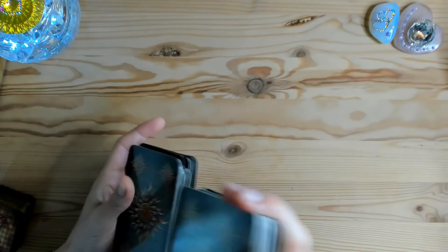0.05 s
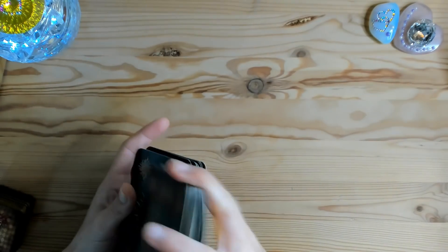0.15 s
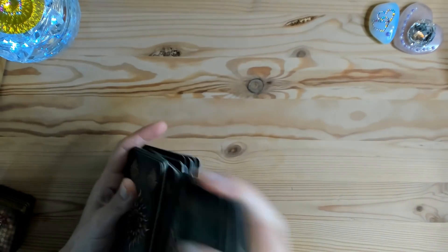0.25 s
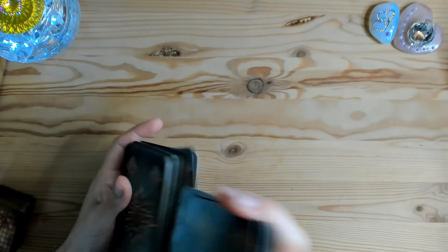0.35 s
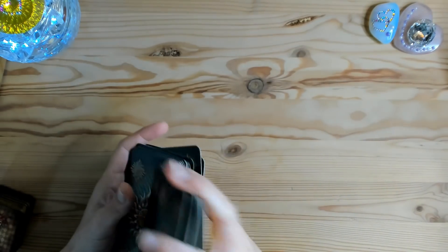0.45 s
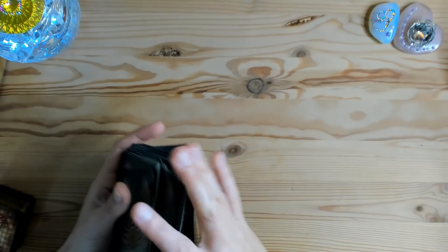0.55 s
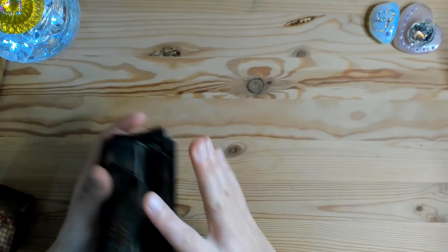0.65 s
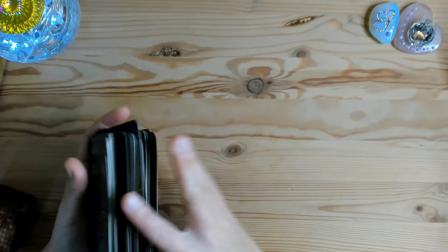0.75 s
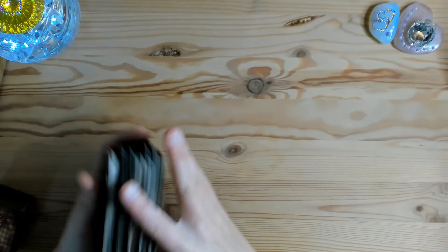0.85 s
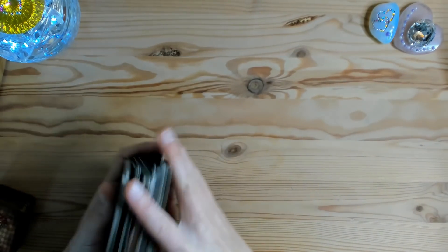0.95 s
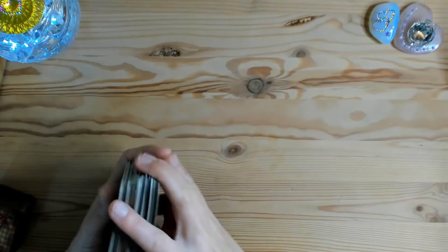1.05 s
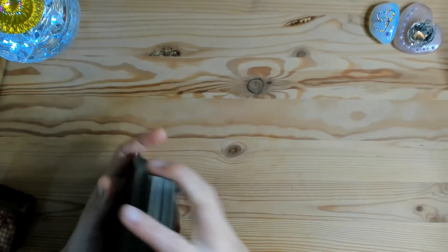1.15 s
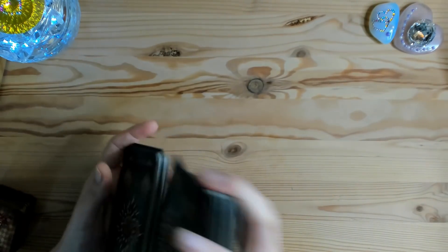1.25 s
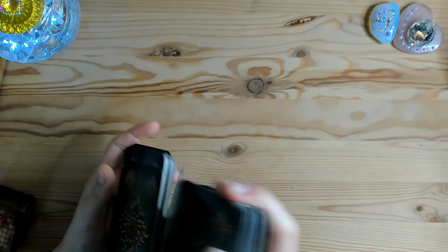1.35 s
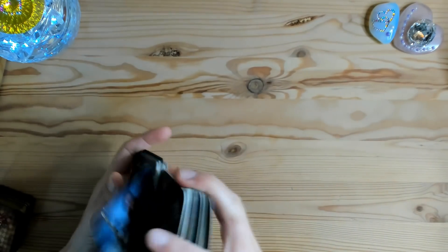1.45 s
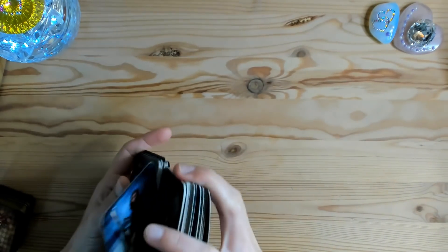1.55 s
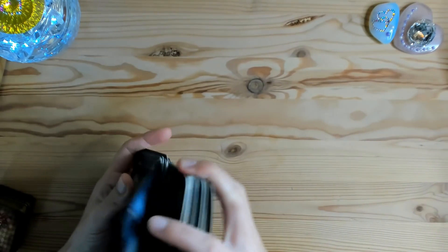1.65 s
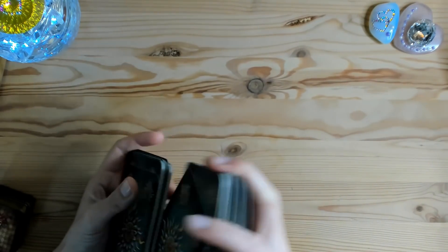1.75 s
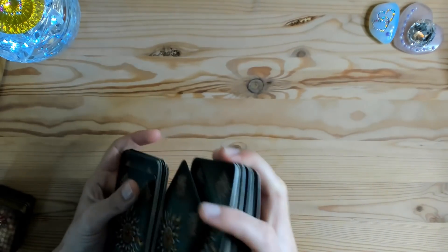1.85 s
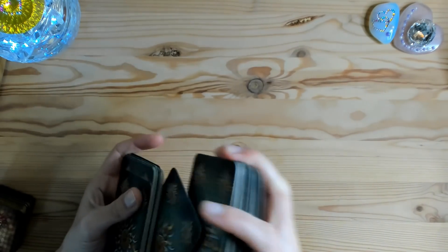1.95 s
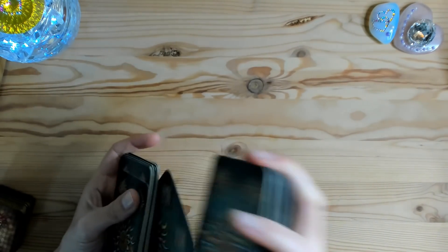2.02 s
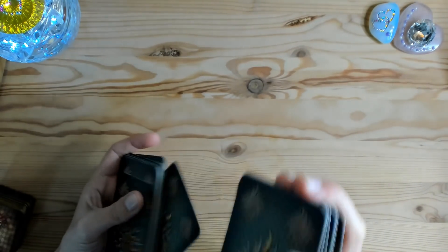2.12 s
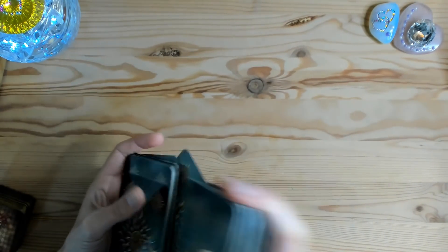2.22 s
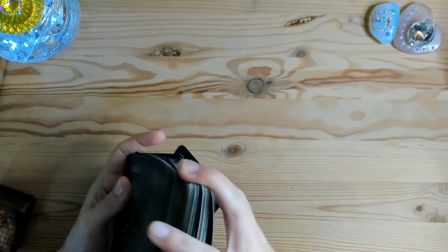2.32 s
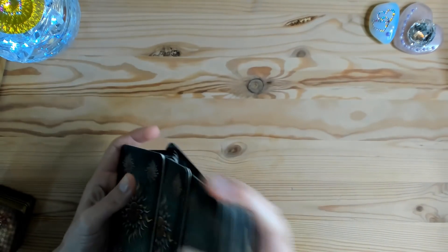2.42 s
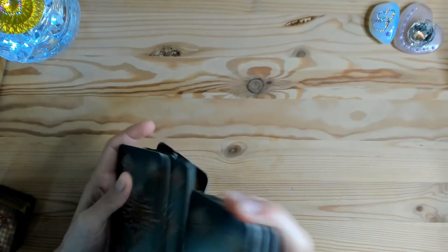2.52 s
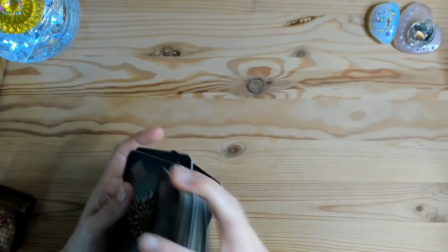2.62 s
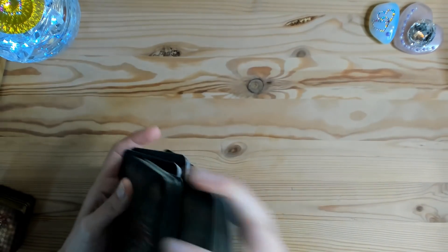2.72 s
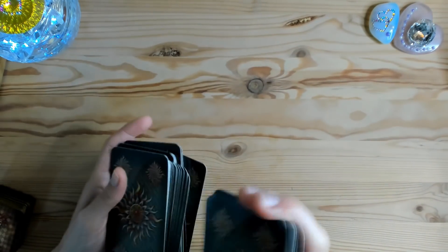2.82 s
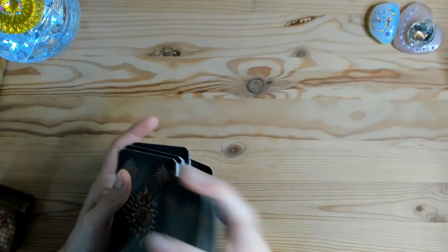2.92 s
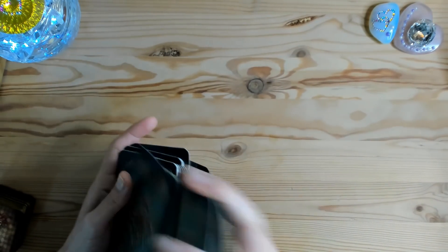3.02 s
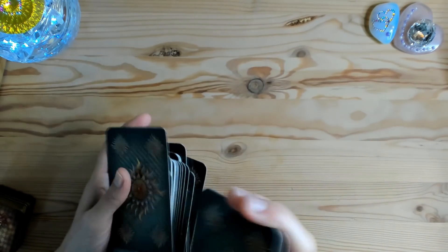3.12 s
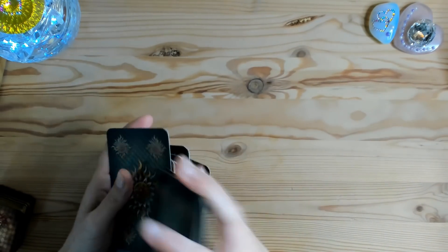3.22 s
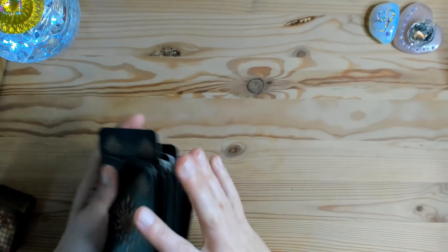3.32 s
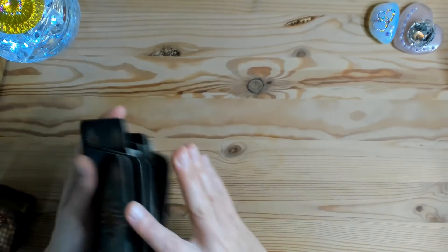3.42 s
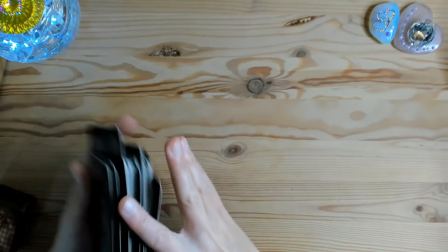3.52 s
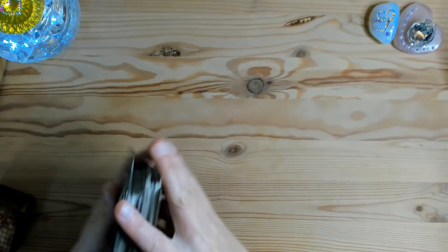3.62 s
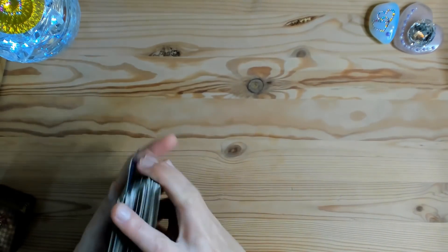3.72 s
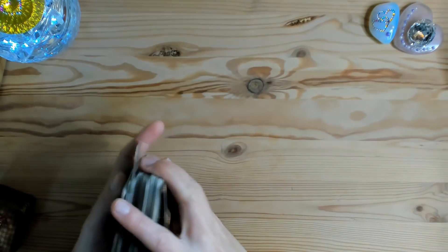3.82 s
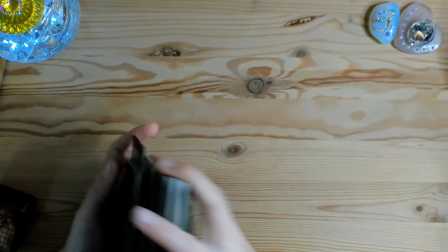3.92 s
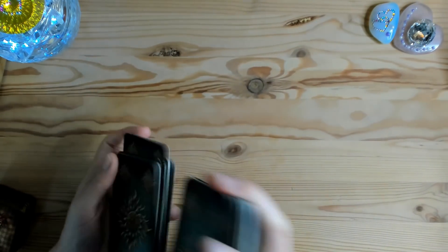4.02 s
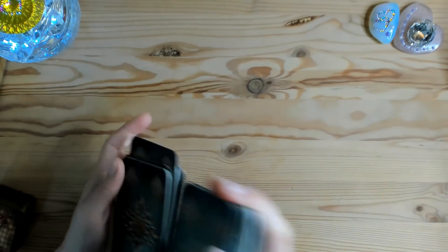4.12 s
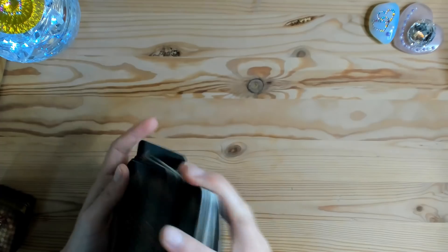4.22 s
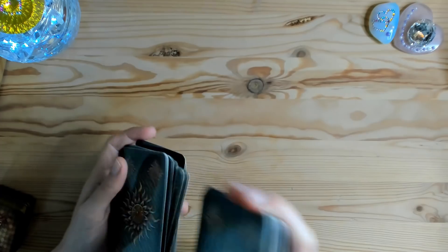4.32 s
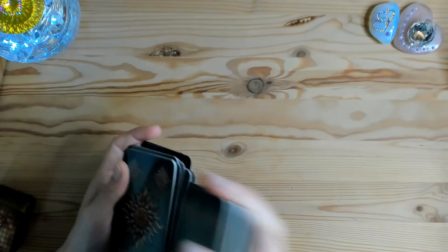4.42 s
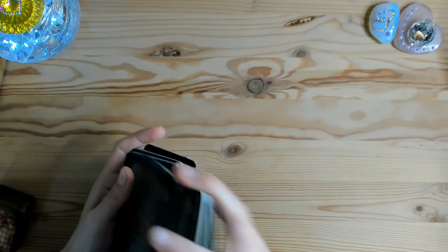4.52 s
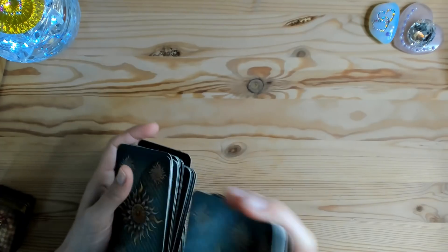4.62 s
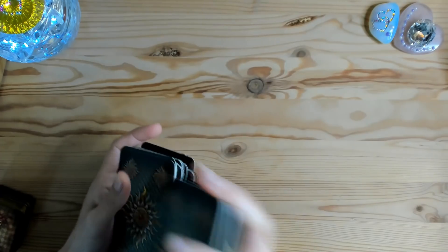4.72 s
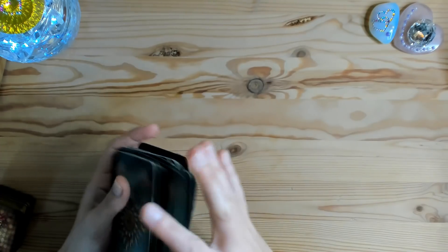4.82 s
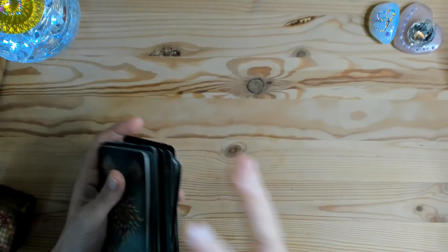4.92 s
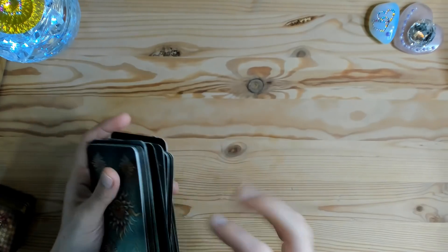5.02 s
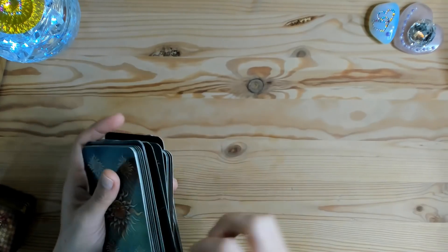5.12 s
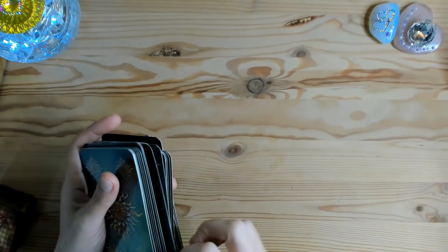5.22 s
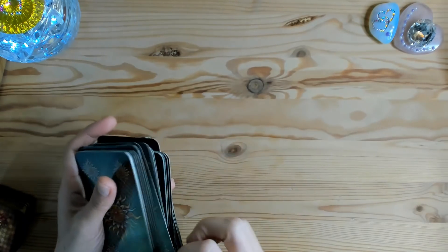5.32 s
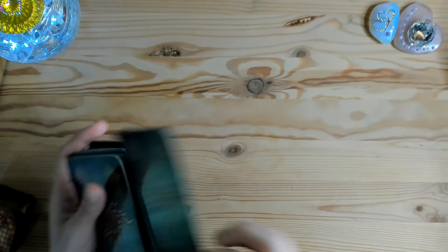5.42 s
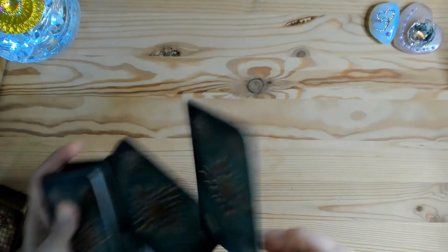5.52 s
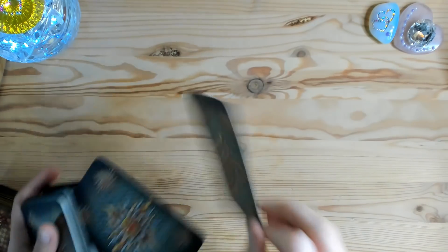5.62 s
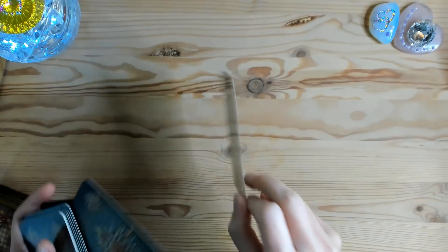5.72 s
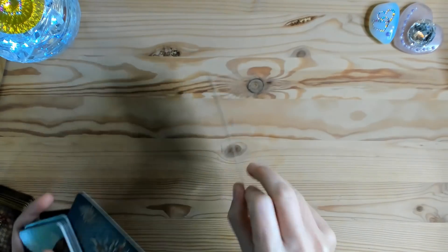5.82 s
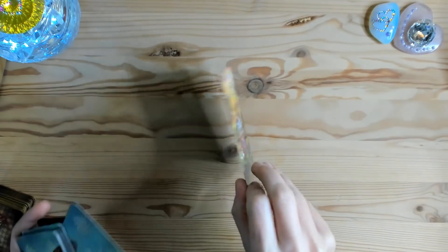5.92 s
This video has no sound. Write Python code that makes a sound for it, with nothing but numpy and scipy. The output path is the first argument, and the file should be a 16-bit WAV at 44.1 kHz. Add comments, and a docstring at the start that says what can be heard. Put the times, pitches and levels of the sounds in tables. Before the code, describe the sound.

Close-up handling of a thick card deck: quick snapping slaps, papery scrapes and dull palm knocks come in uneven groups, with soft squaring rubs between them. A few airy slips whisk by after one second, a hard double crack follows at two, and more packets drop until nearly five. Then there is a brief lull and a light rustle as a card is drawn. Dry room, very short reflections, low steady background.

```python
"""Large cards are shuffled overhand above a wooden table: each landing card mixes an air puff (noise),
a clap (dying sines of air pocket and deck) and an edge tick (bright noise).
Packets slide as rasping and hissing friction noise; cards, deck and palm thud and knock as short low pushes.
Light rubs lift or square the deck or draw a card, quick slips swell and die as noise, the hands stir a rumble.
Close echoes, a faint dull tail and a quiet, steady room tone of filtered noise surround them."""
import sys
import numpy as np
from scipy import signal
from scipy.fft import rfft, irfft, next_fast_len
from scipy.io import wavfile

SR = 44100
rng = np.random.default_rng(int(sys.argv[2]) if len(sys.argv) > 2 else 0)


def pcm_store(signal):
    """Save signal as 16-bit PCM."""
    levels = np.round(np.clip(np.atleast_2d(signal), -1, 1) * 32767)
    wavfile.write(sys.argv[1], SR, levels.astype(np.int16).T)


N = 262819
TIME = np.arange(N) / SR
HIT_TIME = np.arange(4096) / SR
HIT_SPAN_S = 0.005


def from_db(db):
    """Decibels to gain."""
    return 10 ** (np.asarray(db) / 20)


def rms_one(x):
    """Scale to rms 1."""
    return x / np.sqrt(np.mean(x ** 2) + 1e-20)


def hit_one(x):
    """Scale a short sound to the energy of rms 1 over one hit span."""
    return x / np.sqrt(np.sum(x ** 2) / (HIT_SPAN_S * SR) + 1e-20)


def add(track, time_s, sound):
    """Mix a sound into a track at a time."""
    start = int(np.clip(round(time_s * SR), 0, N - 1))
    track[start:start + len(sound)] += sound[:N - start]


def colour(x, spectrum):
    """Causal minimum-phase filter that follows a spectrum, via the folded cepstrum."""
    size = 2 * next_fast_len(len(x))
    hz, db = np.transpose(spectrum)
    bins_hz = np.maximum(np.arange(size // 2 + 1) * SR / size, 1)
    bins_db = np.interp(np.log(bins_hz), np.log(hz), db)
    cepstrum = irfft(np.log(from_db(bins_db)))
    cepstrum[1:size // 2] *= 2
    cepstrum[size // 2 + 1:] = 0
    response = np.exp(rfft(cepstrum))
    return irfft(rfft(x, size) * response)[:len(x)]


def drift(turns_per_s):
    """Bounded random wander of rms 1."""
    steps = rng.uniform(-1, 1, N // 10)
    return rms_one(np.interp(TIME * turns_per_s, np.arange(len(steps)), steps))


def ring(hz, t60_s):
    """A struck, dying sine."""
    return np.sin(2 * np.pi * hz * HIT_TIME) * from_db(-60 * HIT_TIME / t60_s)


def burst(spectrum, t60_s, snap):
    """A sharp contact followed by a dying scatter of tiny ones."""
    scatter = rng.standard_normal(len(HIT_TIME)) * from_db(-60 * HIT_TIME / t60_s)
    scatter[0] = snap
    return hit_one(colour(scatter, spectrum))


def thin(x, corner_hz):
    """A small source radiates little below a corner."""
    corner_hz = np.clip(corner_hz, 50, SR / 4)
    return signal.sosfilt(signal.butter(2, corner_hz, "high", fs=SR, output="sos"), x)


def friction(spectrum, catches_per_s, size_db, smooth_db, flutter_db, flutter_per_s):
    """Tiny catches of uneven size on a smooth rub, fluttering as the card sticks and slips."""
    signs = rng.choice([-1, 1], N)
    sizes = from_db(size_db * np.minimum(rng.exponential(1, N), 4)) * signs
    catches = rms_one(sizes * (rng.random(N) < catches_per_s / SR))
    rub = catches + from_db(smooth_db) * rng.standard_normal(N)
    flutter = from_db(flutter_db * drift(flutter_per_s))
    return rms_one(colour(rub * flutter, spectrum))


# clearest landing cards:
# (time [s], puff before trim [dB], clap before trim [dB], tick before trim [dB], clap pitch [Hz])
SLAP_HITS = [(0.0791, -33, -42, -39, 1590), (0.085, -66, -30, -57, 2630), (0.0919, -52, -19.5, -27, 2076),
             (0.1403, -45, -37.5, -36.5, 3670), (0.1502, -55, -46, -46, 3900),
             (0.2172, -35.5, -45.5, -49, 3200), (0.2816, -44.5, -43, -38.5, 2000),
             (0.377, -38, -33.5, -41, 1980), (0.385, -48, -33.5, -36, 1590), (0.4596, -46, -42, -44, 1120),
             (0.4629, -35.5, -38.5, -44, 1540), (0.6044, -54, -50.5, -67, 940),
             (1.158, -41.5, -57, -69, 870), (1.288, -30, -47, -59, 835), (1.528, -46, -59, -73, 1260),
             (1.606, -31.5, -31.5, -36, 1060), (1.634, -57, -42.5, -70, 870),
             (1.6398, -51, -39.5, -69, 1241), (2.2196, -26, -28, -25.5, 1970),
             (2.2227, -64, -31.5, -50, 1314), (2.239, -53, -42, -38, 1850),
             (2.2427, -30, -27.5, -33.5, 1737), (2.249, -32.5, -33, -33.5, 2020),
             (2.5407, -41.5, -43, -54, 1570), (2.567, -47.5, -51, -54.5, 1440),
             (2.596, -55, -52.5, -59, 1630), (2.6373, -35, -44, -56, 900), (2.69, -47, -55.5, -70, 1350),
             (2.822, -53, -60.5, -68, 2600), (2.88, -42, -30.5, -36.5, 1590),
             (2.8884, -36, -35.5, -32.5, 2770), (3.14, -36, -50.5, -45.5, 2450),
             (3.1947, -56, -46, -45, 2144), (3.207, -42.5, -46, -41, 2040), (3.331, -47.5, -63, -65, 850),
             (3.555, -52, -66, -50.5, 3050), (3.703, -43, -50.5, -47.5, 2665), (3.876, -42, -49, -70, 803),
             (3.913, -66.5, -64.5, -60, 2200), (4.042, -76.5, -66, -66, 2980),
             (4.1368, -36, -39.5, -40.5, 2480), (4.1398, -40, -38.5, -53, 1680),
             (4.217, -57, -53.5, -55.5, 2700), (4.387, -29, -39, -43, 2040), (4.393, -40, -35, -49, 1220),
             (4.4052, -55, -37.5, -34.5, 2954), (4.448, -53, -45.5, -39, 2210),
             (4.615, -53, -57, -61, 1830), (4.6728, -46, -52, -44, 1950), (4.6925, -37, -43.5, -46, 1760),
             (4.7092, -55, -42, -48, 1973), (4.726, -59, -46.5, -44, 2170), (4.748, -48, -45.5, -38, 2570),
             (5.41, -47.5, -60, -51.5, 3000), (5.504, -54, -54.5, -54, 995), (5.63, -63, -78, -62, 3260)]
# ringing of the held deck: (frequency [Hz], relative level [dB], t60 [s])
DECK_RESONANCES = [(562, -36, .015), (1020, -10, 0.0019), (1400, -37, 0.019), (1545, 17, 0.017),
                   (1820, -6.5, 0.092), (2013, 11.5, 0.015), (2460, 27.5, 0.0032), (3203, 7.5, 0.036),
                   (3590, -30, 0.02)]
# puff spectrum: (frequency [Hz], relative level [dB])
PUFF_SPECTRUM = [(80, 2), (200, -0.5), (330, -2), (480, -4), (750, -10), (1100, -9.5), (2500, -31.5)]
# edge tick spectrum: (frequency [Hz], relative level [dB])
TICK_SPECTRUM = [(1500, -16), (3100, 0), (4700, 1), (6200, 2.5), (7700, 2), (9700, -9), (13000, -12.5),
                 (16000, -20)]


def slaps(pocket_t60_s=0.017, deck_db=-3.0, vary_db=4.0, puff_trim_db=-4.5, clap_trim_db=-1.0,
          tick_trim_db=-3.0, hard_db=-33.5, corner_share=0.66):
    """A landing card pushes out air, rings the closing air pocket and the deck, and ticks with its edge."""
    out = np.zeros(N)
    mode_count = len(DECK_RESONANCES)
    for time_s, puff_db, clap_db, tick_db, hz in list(SLAP_HITS) + loose_cards() + stray_edges():
        # every landing point favours other modes
        signs = rng.choice([-1, 1], mode_count)
        strengths = from_db(vary_db * rng.standard_normal(mode_count)) * signs
        deck = sum(strength * from_db(db) * ring(mode_hz, t60_s)
                   for strength, (mode_hz, db, t60_s) in zip(strengths, DECK_RESONANCES))
        pocket = hit_one(ring(hz, pocket_t60_s))
        clap = hit_one(thin(pocket + from_db(deck_db) * hit_one(deck), corner_share * hz))
        # a hard landing is one clean crack, a soft one mostly scatter
        hardness = np.sqrt(from_db(max(clap_db, tick_db) - hard_db))
        puff = burst(PUFF_SPECTRUM, t60_s=0.029, snap=-8.0 * hardness)
        tick = burst(TICK_SPECTRUM, t60_s=0.014, snap=3.2 * hardness)
        add(out, time_s, from_db(clap_db + clap_trim_db) * clap)
        add(out, time_s, from_db(puff_db + puff_trim_db) * puff)
        add(out, time_s, from_db(tick_db + tick_trim_db) * tick)
    return out


# levels before the slap trims, re the packet's listed rasp
LOOSE_CARDS_PER_S = 70
LOOSE_PUFF_DB, LOOSE_CLAP_DB, LOOSE_TICK_DB, LOOSE_SPREAD_DB = -14.5, -7.5, -5, 5.5
LOOSE_HZ, LOOSE_SPREAD_OCTAVES = 2297, 0.35


def loose_cards():
    """Single cards land at uneven intervals while a packet slides; rows as in SLAP_HITS."""
    rows = []
    offsets_db = np.array([LOOSE_PUFF_DB, LOOSE_CLAP_DB, LOOSE_TICK_DB])
    for start_s, length_s, rasp_db, _ in PACKET_DROPS:
        delays_s = (np.arange(8) + rng.uniform(0.5, 1.5, 8)) / LOOSE_CARDS_PER_S
        for delay_s, chance in zip(delays_s, rng.standard_normal((len(delays_s), 4))):
            levels_db = rasp_db + offsets_db + LOOSE_SPREAD_DB * chance[:3]
            hz = LOOSE_HZ * 2 ** (LOOSE_SPREAD_OCTAVES * chance[3])
            if delay_s < length_s:
                rows.append((start_s + delay_s, *levels_db, hz))
    return rows


# levels before the slap trims, re the rub's listed rasp
STRAY_PER_S = 18
STRAY_PUFF_DB, STRAY_CLAP_DB, STRAY_TICK_DB = -2.5, -6, -1.5


def stray_edges(spread_db=5.0, reach=1.3, max_count=6):
    """Card edges catch at random moments around each rub; rows as in SLAP_HITS."""
    rows = []
    offsets_db = np.array([STRAY_PUFF_DB, STRAY_CLAP_DB, STRAY_TICK_DB])
    for middle_s, half_s, rasp_db, _ in LIGHT_RUBS:
        chances = rng.uniform(-1, 1, (max_count, 3))
        for k, (place, size, pitch) in enumerate(chances):
            levels_db = rasp_db + offsets_db + spread_db * size
            hz = LOOSE_HZ * 2 ** (LOOSE_SPREAD_OCTAVES * pitch)
            if k < STRAY_PER_S * 2 * half_s:
                rows.append((middle_s + reach * half_s * place, *levels_db, hz))
    return rows


def push(hz, rise_cycles):
    """A soft push that swings back and dies."""
    age = hz * HIT_TIME / rise_cycles
    return -age * np.exp(1 - age) * np.sin(2 * np.pi * hz * HIT_TIME)


RECOIL_DB, RECOIL_HZ = -8.5, 61   # level re the thud
# low thuds and knocks of cards, deck and palm, strong and faint:
# (time [s], level before trim and recoil [dB], pitch [Hz])
LOW_THUDS = [(0.08, -24, 147), (0.091, -25, 270), (0.181, -39.5, 500), (0.206, -32, 500), (0.284, -32, 318),
             (0.383, -33.5, 91), (0.463, -40, 203), (0.608, -39.5, 184), (1.354, -33, 296),
             (1.36, -29.5, 84.4), (1.368, -36, 310), (1.386, -32.5, 60.1), (1.527, -38.5, 93.5),
             (1.538, -41, 296), (1.606, -27, 67.6), (2.22, -23.5, 230), (2.242, -28.5, 132),
             (2.691, -37, 117), (2.877, -27.5, 151), (2.891, -33, 75), (3.148, -34.5, 98),
             (3.675, -34.5, 60), (3.704, -34, 92), (4.137, -28, 170), (4.147, -31, 173),
             (4.406, -31.5, 125.5), (4.446, -38.5, 79.3), (4.691, -35.5, 96), (5.361, -41, 60.4),
             (5.385, -55, 190), (5.405, -41.5, 138.4), (5.505, -38, 220)]


def thuds(rise_cycles=0.28, trim_db=1.0):
    """Each thud or knock is a push that dies within a cycle or two; the hand gives way as a 61 Hz push."""
    out = np.zeros(N)
    recoil = from_db(RECOIL_DB) * push(RECOIL_HZ, rise_cycles)
    for time_s, db, hz in list(LOW_THUDS) + bumps():
        add(out, time_s, from_db(db + trim_db) * (push(hz, rise_cycles) + recoil))
    return out


def bumps(level_before_trim_db=-38.5, mean_hz=94.6, spread_octaves=0.067):
    """Every packet slide ends against the palm; rows as in LOW_THUDS."""
    pitches_hz = mean_hz * 2 ** (spread_octaves * rng.standard_normal(len(PACKET_DROPS)))
    return [(start_s + length_s, level_before_trim_db, hz)
            for (start_s, length_s, _, _), hz in zip(PACKET_DROPS, pitches_hz)]


DROP_RISE_DB_PER_S, DROP_SAG_DB_PER_S, DROP_FALL_DB_PER_S = 1509, 20.5, 543
RUB_FADE_DB, RUB_ROUNDNESS = 8.5, 1.39   # loss half a length from the middle; exponent of that loss
FLOOR_RASP_DB, FLOOR_HISS_DB = -74.5, -82   # before trim: steady faint noise floor under the slides
# packets sliding down into the deck:
# (start [s], length [s], edge rasp before trim [dB], face hiss before trim [dB])
PACKET_DROPS = [(0.085, .036, -41, -42), (0.141, .072, -46.5, -59), (0.377, 0.11, -46.5, -51),
                (1.282, 0.081, -39.5, -42), (1.602, 0.056, -54, -55.5), (2.227, .042, -47.5, -50),
                (2.635, .02, -48, -62), (2.87, 0.024, -42, -45.5), (2.903, 0.091, -50, -53),
                (3.145, 0.078, -45.5, -52), (3.351, 0.0095, -49, -58), (4.132, 0.027, -42.5, -46.5),
                (4.399, 0.023, -38, -44), (4.429, 0.041, -47.5, -51), (4.687, 0.067, -48.5, -49.5)]
# light rubs as the deck is lifted, squared or a card is drawn:
# (middle [s], half length [s], rasp before trim [dB], hiss before trim [dB])
LIGHT_RUBS = [(0.075, 0.021, -70, -52), (0.263, 0.029, -60.5, -65.5), (0.646, 0.031, -53, -58.5),
              (0.756, 0.035, -57, -53.5), (0.899, .035, -57.5, -60.5), (1.041, .13, -66, -58),
              (1.207, 0.042, -46.5, -54), (1.393, 0.061, -56, -72), (1.486, .018, -59.5, -73),
              (1.595, 0.036, -56.5, -62), (1.803, 0.08, -66, -74), (1.911, 0.033, -50, -57.5),
              (2.024, 0.021, -58.5, -64.5), (2.28, 0.084, -56, -62.5), (2.439, 0.027, -53.5, -57),
              (2.618, 0.059, -55, -59), (3.446, 0.056, -58, -55.5), (3.646, 0.18, -62.5, -63),
              (3.804, .072, -54, -57.5), (4.139, 0.048, -65, -56.5), (4.306, 0.026, -65.5, -68.5),
              (4.768, 0.1, -71.5, -65), (5.339, 0.054, -56, -54), (5.444, 0.12, -68.5, -72.5)]


def slide_levels():
    """Gains of rasp and hiss: a drop starts abruptly, sags and stops; a rub swells and fades evenly."""
    time = TIME[::32]
    shapes = []
    for start_s, length_s, rasp_db, hiss_db in PACKET_DROPS:
        age = time - start_s
        rise_db = DROP_RISE_DB_PER_S * np.maximum(-age, 0)
        sag_db = DROP_SAG_DB_PER_S * np.maximum(age, 0)
        fall_db = DROP_FALL_DB_PER_S * np.maximum(age - length_s, 0)
        shapes.append((from_db(-(rise_db + sag_db + fall_db)), rasp_db, hiss_db))
    for middle_s, half_s, rasp_db, hiss_db in LIGHT_RUBS:
        distance = np.minimum(np.abs(time - middle_s) / half_s, 10)
        shapes.append((from_db(-RUB_FADE_DB * distance ** RUB_ROUNDNESS), rasp_db, hiss_db))
    rasp_power, hiss_power = from_db(FLOOR_RASP_DB) ** 2, from_db(FLOOR_HISS_DB) ** 2
    for shape, rasp_db, hiss_db in shapes:
        rasp_power = rasp_power + (from_db(rasp_db) * shape) ** 2
        hiss_power = hiss_power + (from_db(hiss_db) * shape) ** 2
    return np.interp(TIME, time, np.sqrt(rasp_power)), np.interp(TIME, time, np.sqrt(hiss_power))


# edge rasp spectrum: (frequency [Hz], relative level [dB])
RASP_SPECTRUM = [(150, -6.5), (330, 5.5), (700, -0.5), (1150, 0), (1650, 1.5), (2300, -0.5), (3200, 1),
                 (4500, -8.5), (7000, -13.5), (14000, -40.5)]
# face hiss spectrum: (frequency [Hz], relative level [dB])
HISS_SPECTRUM = [(1500, -35), (3000, -4.5), (4800, -1.5), (6200, 4), (7800, 0.5), (9500, -5.5),
                 (13000, -9.5), (16000, -16)]


def sliding(rasp_gain, hiss_gain, rasp_trim_db=-4.5, hiss_trim_db=-2.5, deck_db=-20.0):
    """Pressed edges rasp coarsely and keep the deck ringing; coated faces hiss finely."""
    rasp = friction(RASP_SPECTRUM, catches_per_s=650, size_db=1.5, smooth_db=1.5,
                    flutter_db=3.5, flutter_per_s=140)
    deck = sum((-1) ** k * from_db(db) * ring(hz, t60_s)
               for k, (hz, db, t60_s) in enumerate(DECK_RESONANCES))
    ringing = rms_one(signal.fftconvolve(rasp, deck)[:N])
    rasp = rasp + from_db(deck_db) * ringing
    hiss = friction(HISS_SPECTRUM, catches_per_s=1800, size_db=3.0, smooth_db=0.5,
                    flutter_db=2.5, flutter_per_s=86)
    return rasp_gain * from_db(rasp_trim_db) * rasp + hiss_gain * from_db(hiss_trim_db) * hiss


# cards whipping past a neighbour: (middle [s], half length to 1/e [s], level [dB])
CARD_FLICKS = [(1.188, 0.0081, -36.5), (1.2075, 0.0042, -30.5), (1.22, 0.007, -44.5), (1.313, 0.016, -38.5),
               (3.362, 0.0032, -42.5), (4.749, 0.0035, -42.5)]
# slip spectrum: (frequency [Hz], relative level [dB])
WHIP_SPECTRUM = [(1500, -15), (3200, -10), (4800, -6), (6200, 1), (8000, 2.5), (9800, -8), (13000, -9),
                 (16000, -17)]


def flicks():
    """A quick slip swells and dies within a few hundredths of a second."""
    speed = np.zeros(N)
    for middle_s, half_s, db in CARD_FLICKS:
        speed += from_db(db) * np.exp(-np.minimum(((TIME - middle_s) / half_s) ** 2, 40))
    slip = friction(WHIP_SPECTRUM, catches_per_s=7000, size_db=2.2, smooth_db=-1.0,
                    flutter_db=1.4, flutter_per_s=600)
    return speed * slip


STIR_DB, STIR_REF_RASP_DB = -47, -50   # stir level at this steady rasp gain
STIR_FOLLOWS, STIR_INERTIA_S = 0.56, 0.02   # share of the rasp's swing in dB; lag
# stirred air spectrum: (frequency [Hz], relative level [dB])
STIR_SPECTRUM = [(15, 2), (30, 9.5), (65, 1.5), (110, -4.5), (200, -15.5), (330, -23.5), (600, -52),
                 (1500, -59)]


def hands(rasp_gain):
    """Moving hands and cards stir a low rumble that follows the sliding and lingers after it."""
    keep = np.exp(-1 / (STIR_INERTIA_S * SR))
    effort = (rasp_gain / from_db(STIR_REF_RASP_DB)) ** STIR_FOLLOWS
    motion = signal.lfilter([1 - keep], [1, -keep], effort, zi=effort[:1])[0]
    rumble = rms_one(colour(rng.standard_normal(N), STIR_SPECTRUM))
    return from_db(STIR_DB) * motion * rumble


# echoes from the table top and nearby things: (delay [s], level [dB])
CLOSE_ECHOES = [(.0014, -25.5), (.0033, -43), (.0062, -21.5)]


def room(x, t60_s=0.17, tail_db=-22.5, dull_hz=4500, gap_s=0.0078):
    """A few close echoes and a faint, dull tail."""
    age = TIME[:SR // 2]
    tail = rng.standard_normal(len(age)) * from_db(-60 * age / t60_s) * (age > gap_s)
    # small sources radiate little bass into the room
    tail = signal.sosfilt(signal.butter(1, [600, dull_hz], "band", fs=SR, output="sos"), tail)
    response = from_db(tail_db) * tail / np.sqrt(np.sum(tail ** 2))
    for delay_s, db in CLOSE_ECHOES:
        response[int(delay_s * SR)] += from_db(db)
    return x + signal.fftconvolve(x, response)[:N]


# room tone spectrum: (frequency [Hz], relative level [dB])
ROOM_TONE_SPECTRUM = [(20, 9), (60, 0), (120, -8), (200, -7.5), (300, -5.5), (450, -13.5), (800, -15.5),
                      (1800, -24), (2500, -29.5), (6000, -45.5), (16000, -39.5)]


def room_tone(level_db=-59.0):
    """Steady noise, strongest in the bass."""
    return from_db(level_db) * rms_one(colour(rng.standard_normal(N), ROOM_TONE_SPECTRUM))


def scene():
    """The shuffle in its room, over a steady room tone."""
    rasp_gain, hiss_gain = slide_levels()
    cards = slaps() + thuds() + sliding(rasp_gain, hiss_gain) + flicks()
    return (room(cards) + hands(rasp_gain) + room_tone())[None]


CUTOFF_HZ = 16300


def record(dry):
    """The microphone drops the deepest rumble; the top is cut."""
    dry = signal.sosfilt(signal.butter(2, 16, "high", fs=SR, output="sos"), dry)
    return signal.sosfilt(signal.ellip(10, 0.2, 80, CUTOFF_HZ, fs=SR, output="sos"), dry)


dry = scene()
out = record(dry)
pcm_store(out)
```